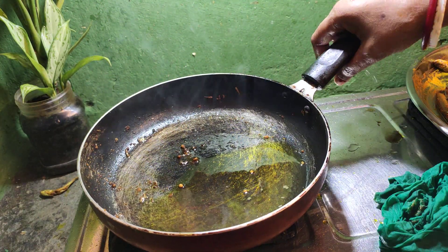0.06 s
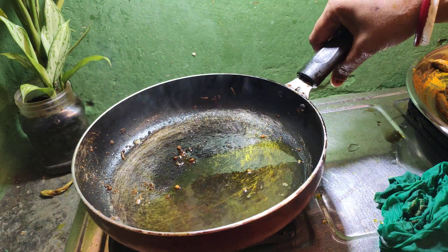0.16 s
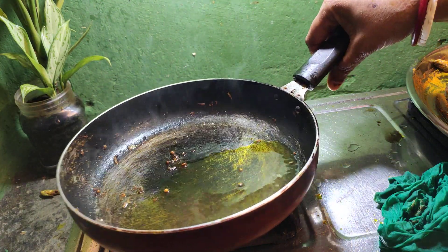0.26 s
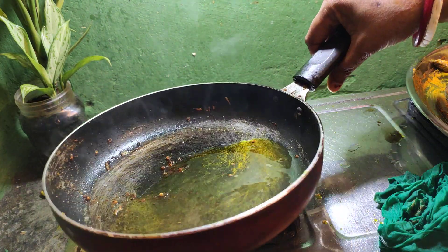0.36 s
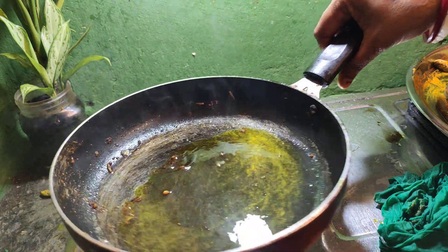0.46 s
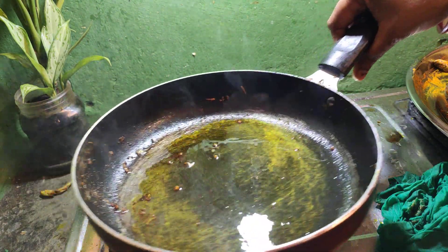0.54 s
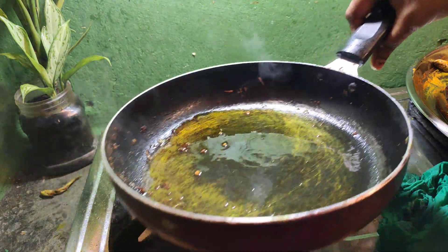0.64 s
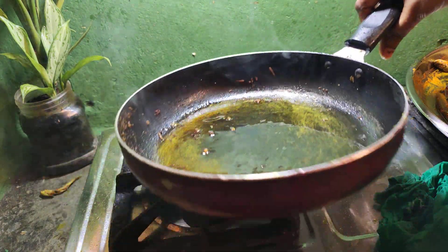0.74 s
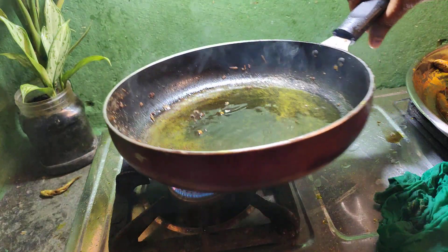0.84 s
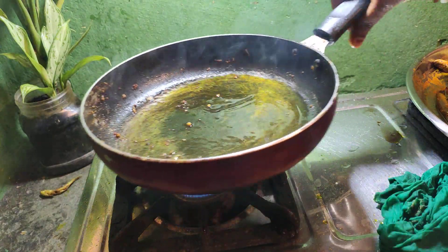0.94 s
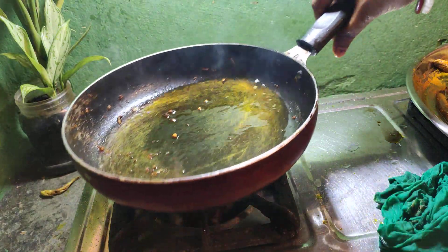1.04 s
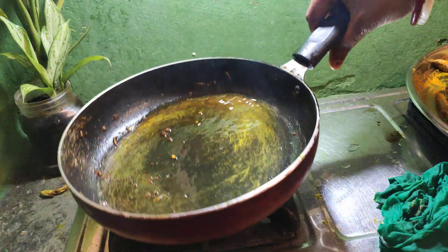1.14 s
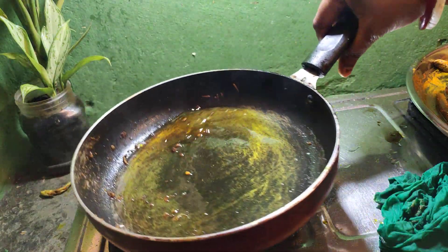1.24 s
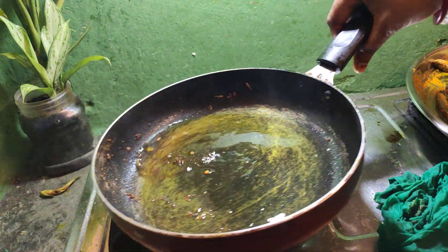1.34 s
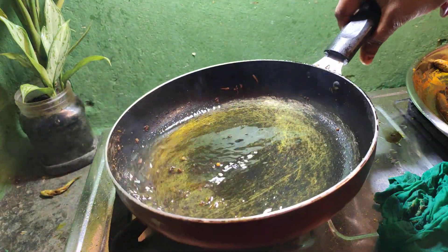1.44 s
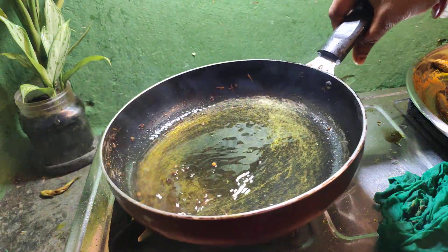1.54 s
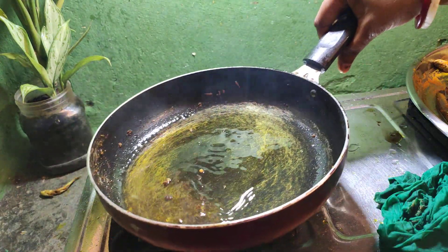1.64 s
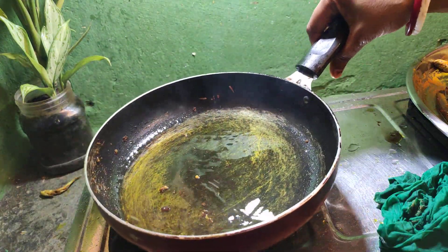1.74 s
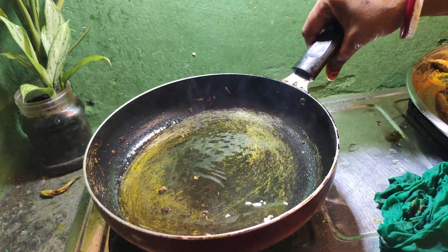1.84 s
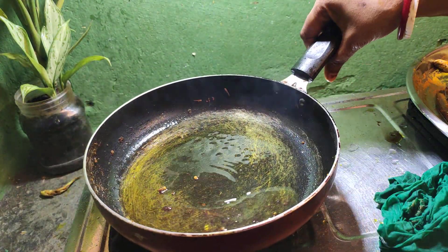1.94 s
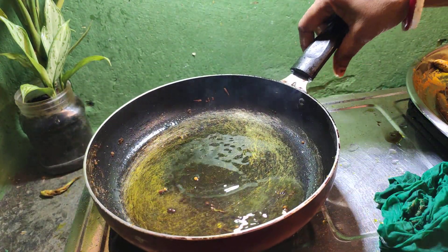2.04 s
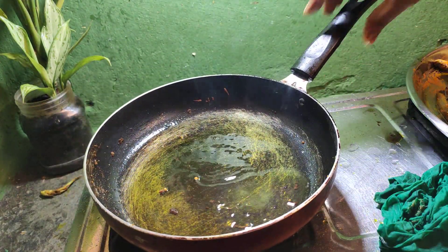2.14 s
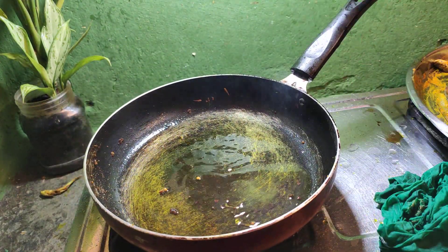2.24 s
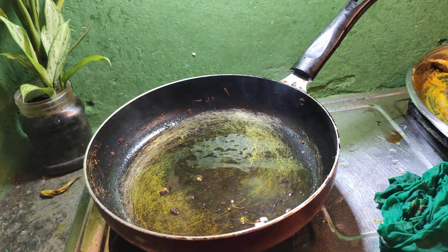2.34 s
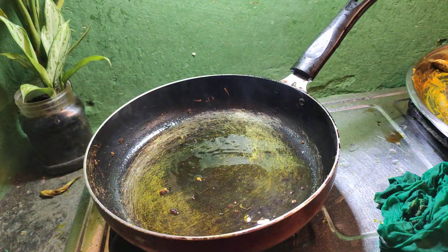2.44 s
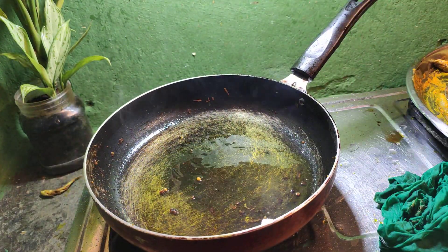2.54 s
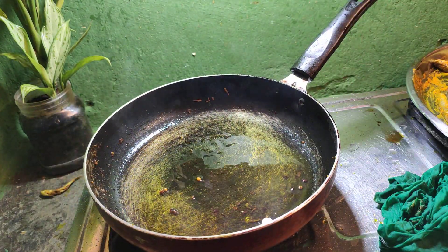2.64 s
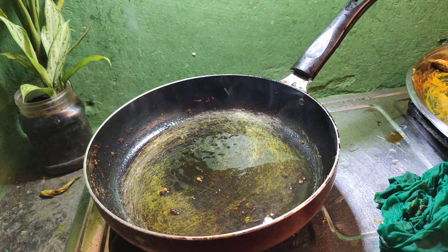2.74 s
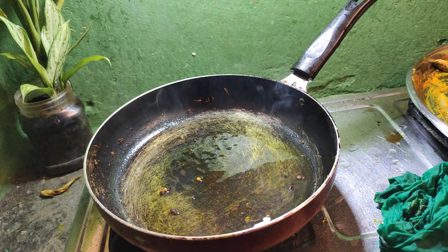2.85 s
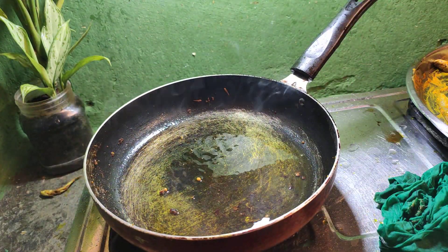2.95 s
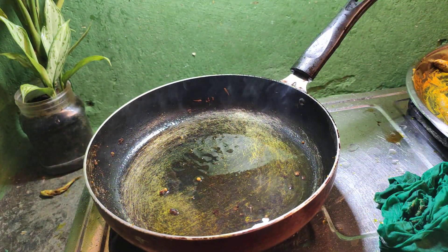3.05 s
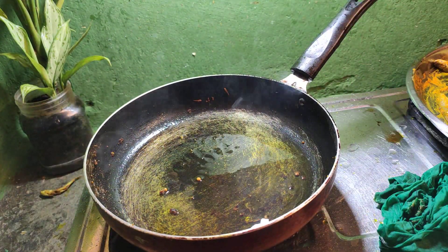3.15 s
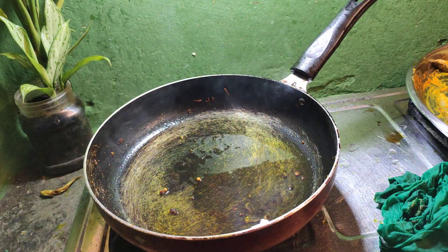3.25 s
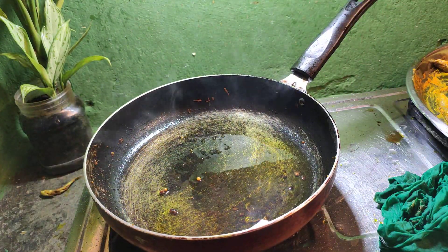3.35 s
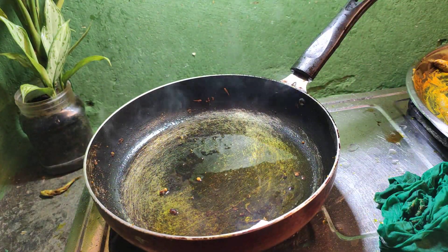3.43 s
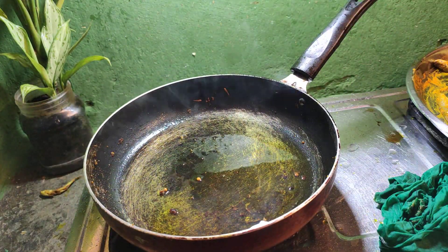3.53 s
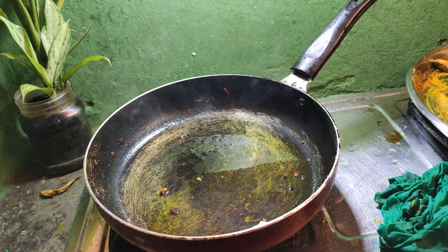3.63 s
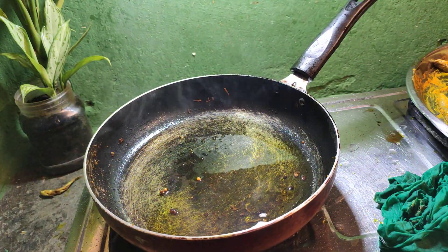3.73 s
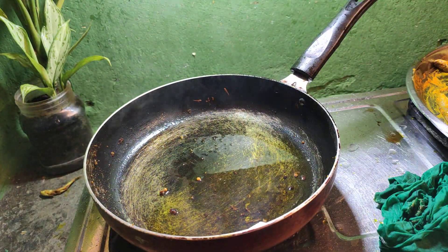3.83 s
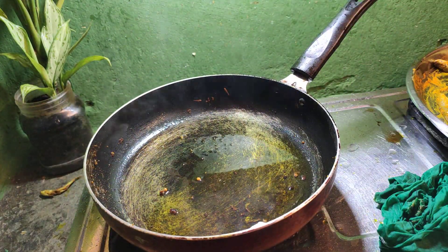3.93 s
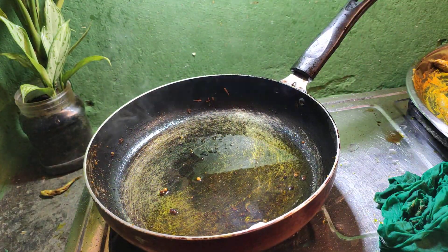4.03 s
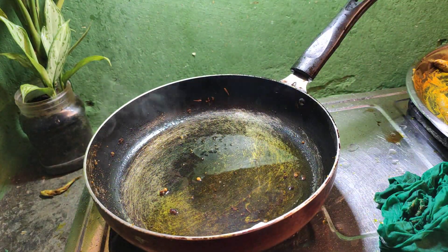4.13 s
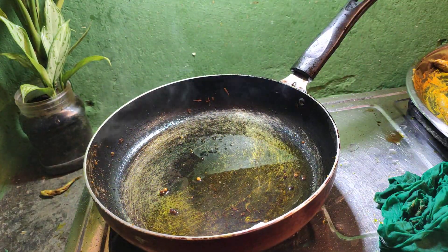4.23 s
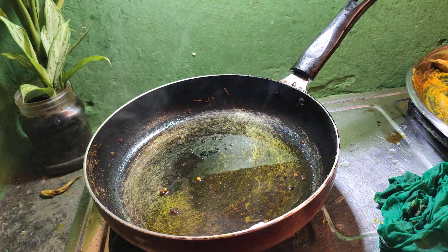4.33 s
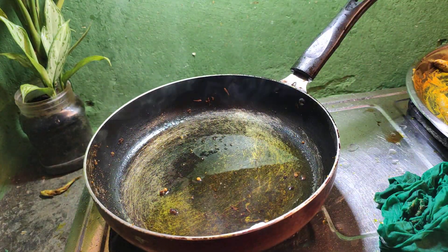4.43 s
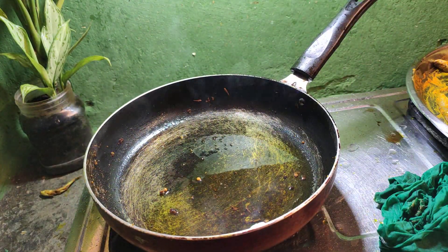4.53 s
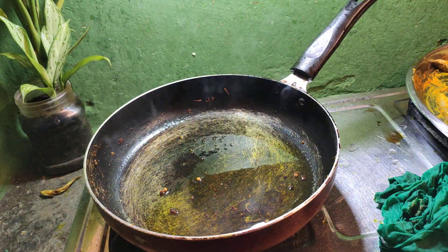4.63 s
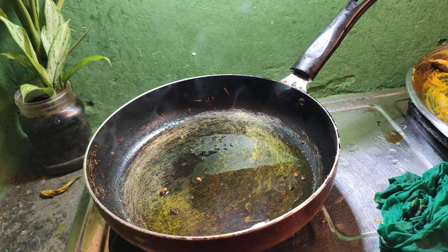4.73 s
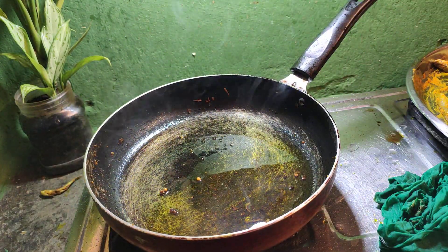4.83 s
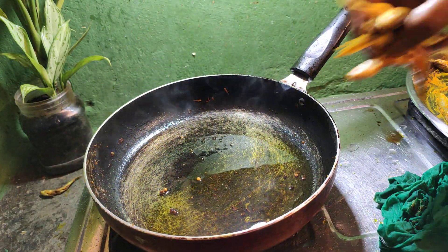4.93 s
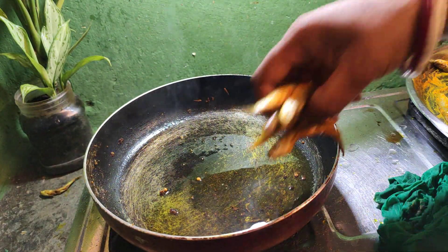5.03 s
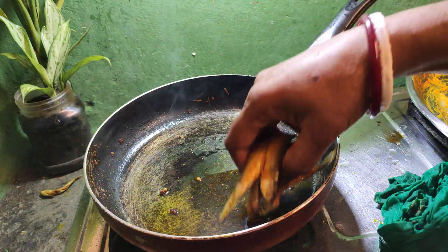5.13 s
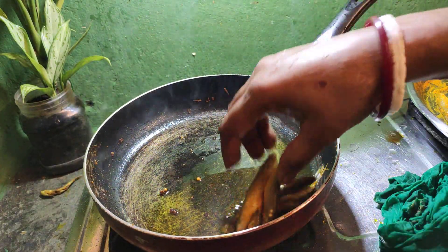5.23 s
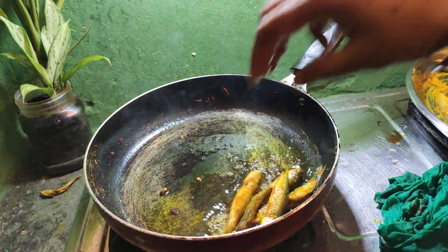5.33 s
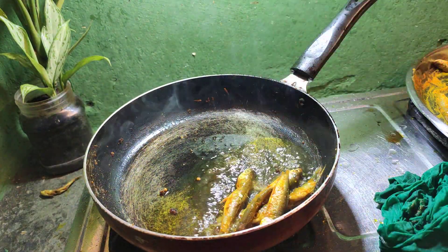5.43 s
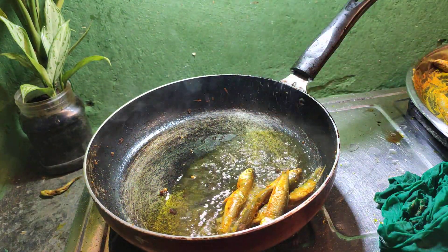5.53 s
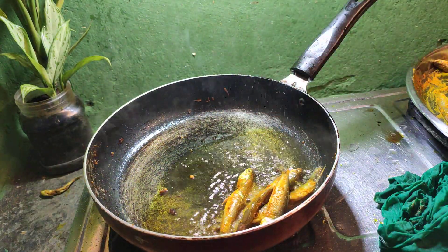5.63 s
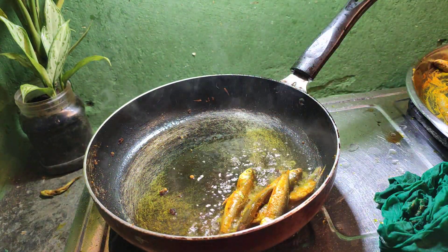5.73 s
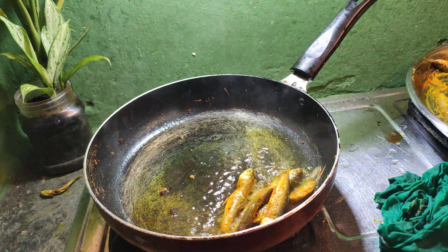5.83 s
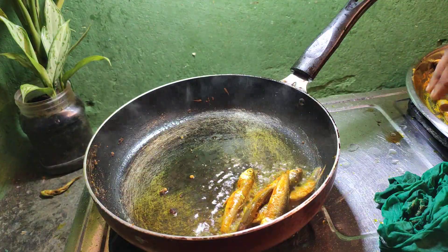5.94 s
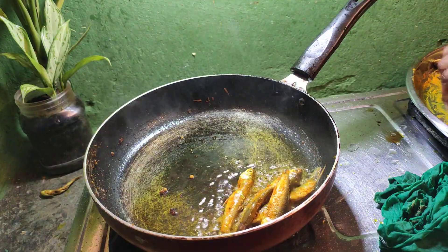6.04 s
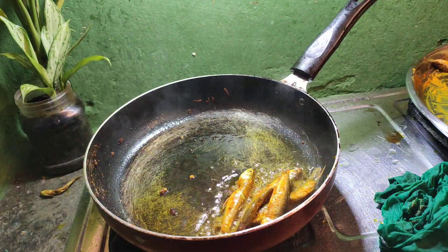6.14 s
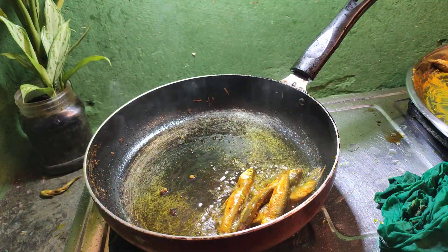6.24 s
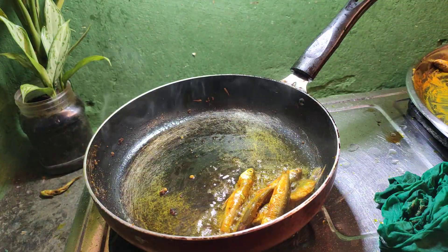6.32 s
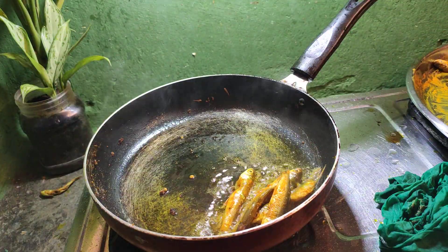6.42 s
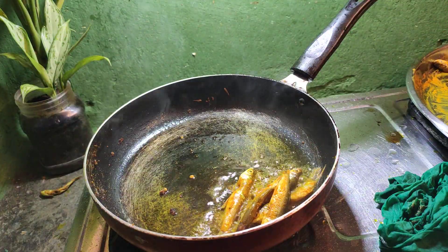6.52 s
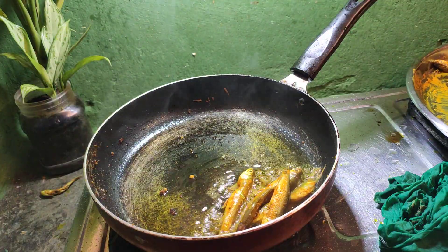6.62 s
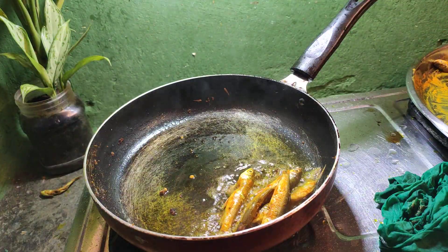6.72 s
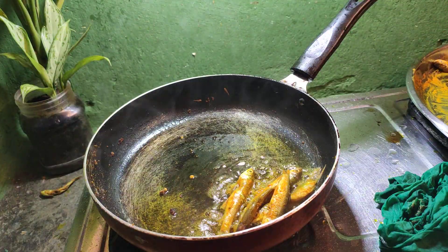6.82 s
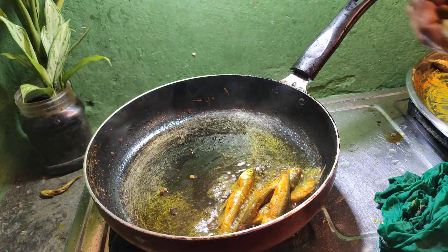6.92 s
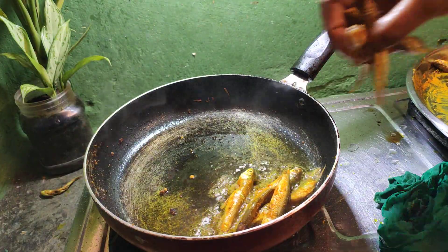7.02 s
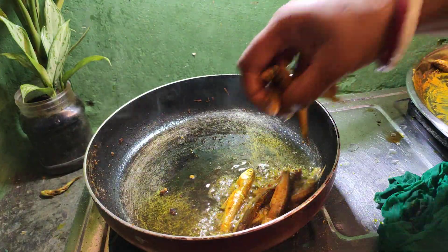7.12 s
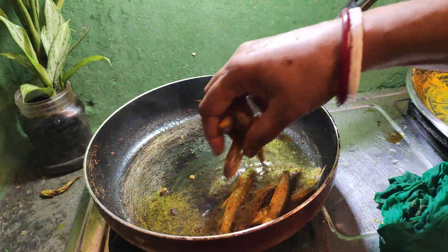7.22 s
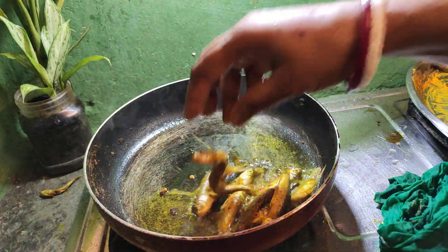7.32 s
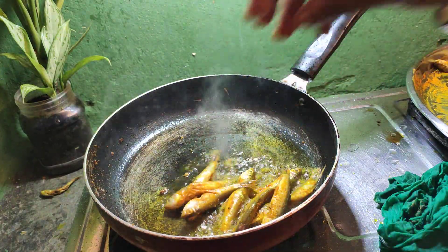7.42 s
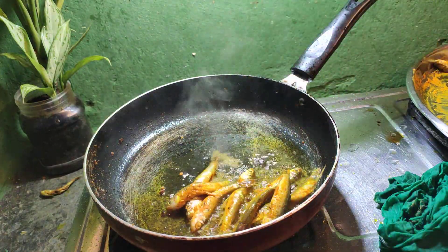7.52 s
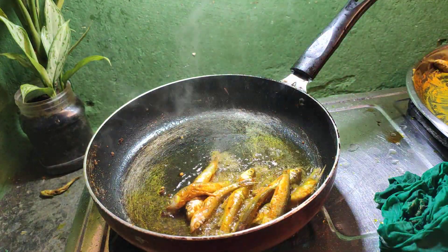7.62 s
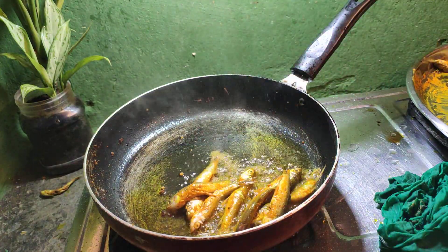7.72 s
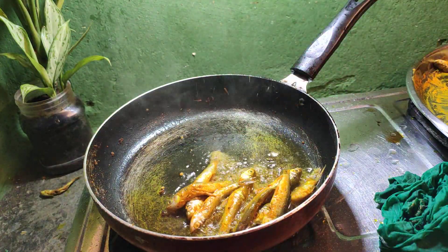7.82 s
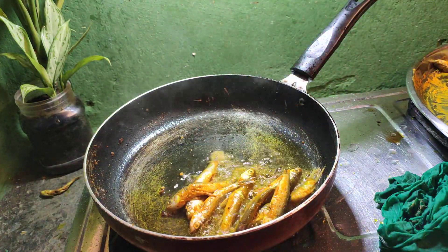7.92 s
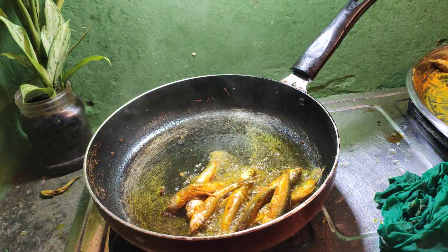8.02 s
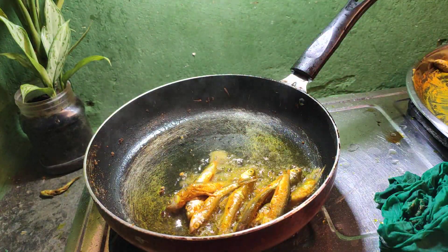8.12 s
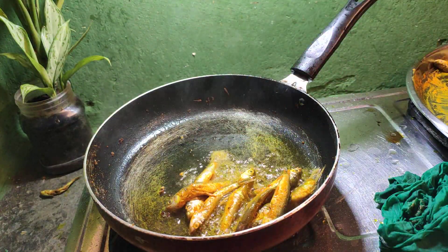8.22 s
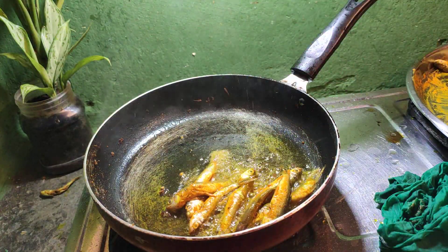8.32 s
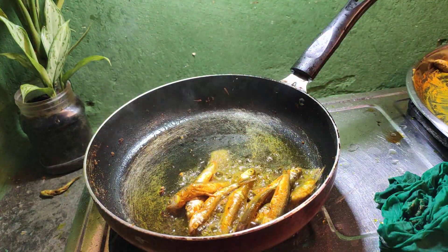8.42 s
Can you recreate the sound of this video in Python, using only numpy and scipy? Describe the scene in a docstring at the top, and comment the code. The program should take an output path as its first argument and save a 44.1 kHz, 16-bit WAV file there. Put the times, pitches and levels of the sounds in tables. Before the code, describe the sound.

Metal pan knocks and light kitchenware clinks in a small kitchen, followed by fish dropping into hot oil with a steady, spitting sizzle.

```python
"""A gas burner hisses over a low hum in a small, hard-walled kitchen. A frying pan knocks and rings as
it is lifted off the stove and swirled; kitchenware clacks, cloth rubs, bangles tick, and near 1.8 s
the pan is set down. From 3.2 s a utensil taps and a steel bowl and dish clink on the counter.
At 5.2 s and 7.3 s two handfuls of small fish go into the hot oil: steam bubbles burst by the thousand
in a sizzle with pops and spits, while dull knocks come from the counter."""
import sys
import numpy as np
from scipy import signal
from scipy.fft import rfft, irfft, next_fast_len
from scipy.io import wavfile
from scipy.ndimage import uniform_filter1d

SR = 44100
rng = np.random.default_rng(int(sys.argv[2]) if len(sys.argv) > 2 else 0)


def bounce(signal):
    """Save signal as a 16-bit WAV file at the path given by the first command-line argument."""
    frames = np.transpose(np.atleast_2d(signal))
    limited = np.clip(frames, -1, 1)
    pcm = np.round(limited * 32767).astype(np.int16)
    wavfile.write(sys.argv[1], SR, pcm)


N = 373527


def frying():
    """Fish in hot oil: sizzle, pops and spits, coloured by the pan they sit in."""
    oil = sizzle() + pops() + spits()
    # the bubbling shakes two low notes of the pan, then its hollow shape lifts two bands of the hiss
    oil = oil + 3.16 * ring(oil, 751.4, 24) + 1.78 * ring(oil, 628, 78)
    return oil + 0.4 * ring(oil, 6800, 880) + 0.17 * ring(oil, 2350, 170)


# How strong the sizzle is from bass to treble: (pitch [Hz], level [dB per Hz])
SIZZLE_TONE = [(24, -68), (40, -32), (248, -27.5), (295, -43), (335, -24), (379, -14.5), (499, -19),
               (744, -10.5), (956, -22.5), (1060, -3.5), (1320, -8.5), (2020, -2.5), (4730, 2), (6880, 2.5),
               (15700, -20)]
def sizzle(bubbles_per_s=3500, cycles=3.06, deep_below_hz=2000, spray_above_hz=3300):
    """Steam bubbles of every size burst at random all over the pan, each ringing for a few cycles."""
    main_db, deep_db, spray_db = boil_up()
    surge = wander(14)  # patches of skin boil up together
    pitches = 50 * 2 ** np.arange(0, 8.4, 1 / 3)
    shares_db = look_up(SIZZLE_TONE, pitches) + 10 * np.log10(pitches)
    shares_db -= 10 * np.log10(np.sum(gain(2 * shares_db)))  # the bands' powers add up to 1
    out = 0
    for hz, share_db in zip(pitches, shares_db):
        rate = bubbles_per_s * min(hz / 4000, 1) ** .4
        bursts = random_clicks(rate, spread_db=1.5, floor=0.0045, max_lag=4)
        band = ring(ring(bursts, hz, hz / cycles), hz, 1.1 * hz / cycles)
        deep = np.clip(np.log2(deep_below_hz / hz), 0, 1)
        spray = np.clip(2 * np.log2(hz / spray_above_hz), 0, 1)
        boil_db = deep * deep_db + (1 - deep - spray) * main_db + spray * spray_db
        out += set_level(band, share_db) * gain(boil_db + surge + 2.83 * wander(25))
    return out + crackle(main_db + 2.2 * surge)


# Fish laid in the oil: (time [s], build-up [s], stays wet [s], sizzle level [dB],
# deep bubbling over the sizzle [dB], fine spray over the sizzle [dB])
HANDFULS = [(5.192, 0.086, 0.3, -26, -4.5, 1.5), (7.297, 0.023, 0.39, -28.5, -1, 1.5)]
def boil_up(drying_s=0.33, settled_db=-6, deep_delay_s=0.036, deep_rise_s=0.049):
    """Each handful boils up, then calms as it dries. Gives sizzle, deep and spray levels in dB."""
    main = deep = spray = 0
    for start, rise_s, wet_s, db, deep_db, spray_db in HANDFULS:
        age = np.maximum(np.arange(N) / SR - start, 0)
        wet = np.exp(-np.maximum(age - wet_s, 0) / drying_s)
        power = gain(2 * db) * (wet + (1 - wet) * gain(2 * settled_db))
        swell = (1 - np.exp(-age / rise_s)) ** 4
        deep_swell = (1 - np.exp(-np.maximum(age - deep_delay_s, 0) / deep_rise_s)) ** 4
        main += power * swell
        deep += power * deep_swell * gain(2 * deep_db)
        spray += power * swell * gain(2 * spray_db * np.exp(-age / drying_s))
    return [10 * np.log10(power + 1e-14) for power in (main, deep, spray)]


def crackle(sizzle_db):
    """Lone droplets burst as sharp clicks, quieter than the sizzle."""
    clicks = random_clicks(per_s=400, spread_db=3, floor=0.014, max_lag=3.3)
    return set_level(ring(ring(clicks, 4200, 5400), 4560, 8000), -11) * gain(sizzle_db)


# The loudest pops in the oil: (time [s], level [dB], pitch [Hz])
POPS = [(5.4034, -24.5, 4530), (5.4492, -23, 4000), (5.4704, -26, 3900), (5.4974, -18.5, 6130),
        (5.629, -22, 5850), (5.7954, -29, 6700), (6.4815, -35, 6050), (6.4957, -22, 4440),
        (6.534, -27, 4460), (6.6072, -19.5, 4160), (6.6864, -24, 3410), (6.725, -21.5, 5740),
        (6.7794, -28, 3230), (7.098, -23, 6370), (7.1456, -21.5, 4560), (7.223, -20, 4780),
        (7.6714, -22.5, 4700), (7.7556, -22.5, 3270), (7.7922, -34, 6130), (8.059, -27, 6260),
        (8.14, -23.5, 3960)]
def pops():
    """Single bursts stand out of the sizzle as short, noisy notes."""
    return short_notes(POPS, fade_s=0.045, noisiness=2.5, sharpness=4, rise_s=0.001)


def spits(count=420, loudest_db=-25, lowest_hz=1697):
    """The oil spits tiny notes at random once the first fish are in."""
    start = HANDFULS[0][0] + .15
    notes = [(start + (N / SR - start) * when, loudest_db - 15.5 * softer, lowest_hz * 4.2 ** higher)
             for when, softer, higher in rng.random((count, 3))]
    return short_notes(notes, fade_s=0.018, noisiness=0.29, sharpness=7.3, rise_s=0.00022)


# The pan hitting the burner stand: (time [s], mid-range level [dB], boom [dB], lows [dB], highs [dB],
# ringing over clatter [dB], extra fading [dB per s], left over right [dB]).
# Boom, lows and highs count from the mid-range level.
PAN_KNOCKS = [(0.038, -66.5, 13, 13, 3, -42, 300, 5), (0.0793, -41.5, -8, 6, -12, -40, 300, -3),
              (0.1129, -29, -17, 0, -18.5, -47, 300, -10.5), (0.1199, -36.5, -6.5, 3.5, -16, -48, 300, 5),
              (0.189, -48, -16, -19, -29.5, -45, 300, -1.0), (0.251, -35, -12.5, 1.5, -15, -43, 200, -4),
              (1.7886, -14, -15, -9.5, -9.5, -31, 60, 3.5), (1.8077, -18.5, -16, -7, -11, -42.5, 100, -3),
              (1.9142, -41, -1.5, 7, -17, -55, 201, 3), (2.0884, -24.5, -9.5, -1, -14.5, -36, 645, 4)]
# The notes the pan rings with: (pitch [Hz], level [dB], time to fade by 60 dB [s])
PAN_NOTES = [(192.9, 0.5, .5), (304, 2.5, .15), (328, -9, 0.26), (385, -6.5, .2), (438, -0.5, 0.508),
             (484, -6.5, 0.26), (551, -4, 0.58), (685, 1.5, 0.38), (757, -5, .15), (1196, -16, .25),
             (1256, -14, 0.27), (1470, -8.5, 0.246), (1996, -16.5, .12), (2382, 6.5, .15), (2840, -13, .1),
             (3290, -7.5, .15), (3610, -12.5, .12), (3900, -14.5, .15), (4527, -12, .15), (4910, -9.5, .15),
             (5640, -6.5, .14), (6240, -10.5, 0.15), (6600, -3, .14), (7800, -18, 0.1196), (8400, -20, .1)]
def pan():
    """The pan rings at each knock, and the stove top thumps under it."""
    knocks = strike(PAN_KNOCKS, PAN_NOTES, tick_db=16, rise_ms=0.4, fade_ms=34.5, top_db=-3.5, lag=0)
    thumps = [(start, db - 36.5, 84.6) for start, db, *_ in PAN_KNOCKS]
    stove = short_notes(thumps, fade_s=0.16, noisiness=1.5, sharpness=1.2, rise_s=0.006, size=16384)
    return knocks + stove


# Each pair below has the columns of PAN_KNOCKS and PAN_NOTES. A steel dish clinking:
DISH_CLINKS = [(3.567, -34, -19, -14, 3.5, -32.5, 250, 9.5), (3.585, -32, -28, -33, -4, -31, 220, -11.5)]
DISH_NOTES = [(326, -5, .5), (1620, -10, .12), (1840, -8, 0.14), (2253, -5.5, .15), (2550, -4.5, 0.29),
              (2980, -12, .1), (3315, 3.5, 0.14), (3948, 7, 0.2), (4210, -11, .13), (5030, -5.5, .15),
              (5792, -8, .12), (6450, -2, 0.18), (7090, -9, .2), (7160, -13, .2), (8016, -20, 0.16),
              (9044, -3, .2), (9620, -5, .16), (11600, -2, .1), (12200, -6, .1)]
# A steel bowl being nudged:
BOWL_CLINKS = [(3.4214, -47, -11, 1.4, -0.82, -32, 100, 11)]
BOWL_NOTES = [(320, -3, .3), (478, -2, 0.21), (1050, -0.5, 0.92), (2280, -3, .04), (3340, -10, .2),
              (3995, -8, .2), (5400, -6, .15), (7030, -5, .12)]
# Other kitchenware clacking and sliding, with a duller sound:
WARE_CLACKS = [(0.4125, -39.5, -31, -20, -21, -53, 60, -10), (0.5394, -52, -30, -15, -4, -48, 30, -12),
               (0.838, -51.5, -32, -22, -13, -56, 30, -7), (4.988, -43.5, -45, -16.5, -18, -51.5, 60, -9.5),
               (5.05, -51, -40, -14, -14, -46, 30, -9), (5.1192, -56, -27, -7.5, 8.5, -50, 30, 7.5)]
WARE_NOTES = [(1087, 1, 0.17), (1464, 10.5, 0.26), (2070, 5, 0.11), (2690, -3, 0.077), (2990, -3, 0.06),
              (3800, 3, 0.05), (4650, -29, 0.043)]
# A utensil being tapped and shifted:
UTENSIL_TAPS = [(3.2236, -53, -33, -30, -1, -35, 301, -0.5), (3.262, -51, -30, -30, -8, -37, 300, 0),
                (3.3179, -51.5, -27, -29, -14, -30, 300, -1), (3.368, -54, -27, -27, -8, -34, 300, 0),
                (4.3074, -38, -17, -13.5, 1.5, -38, 300, 0.52),
                (4.3155, -39.5, -30, -25, 3, -32, 300, -0.25), (4.323, -40, -27, -28, 4, -42, 300, 0),
                (4.4693, -51, -37, -37, 1, -30, 297, -2)]
UTENSIL_NOTES = [(414, 3, .02), (1110, 0, .02), (2330, -1, .06), (2654, 5.5, .05), (3429, 0, .06),
                 (3760, 8, .12), (4160, 7, 0.031), (4300, 10, 0.09), (4474, 5, .1), (5830, 3, .1),
                 (6160, 14, .06), (6800, 7, .1), (8230, 0, .1), (8770, 10, .08)]
def kitchenware(lag=-17):
    """Things ring when bumped on the counter. It is on the left, so that side hears them first."""
    steel = dict(tick_db=10.2, rise_ms=4.1, fade_ms=50, top_db=6.7, lag=lag)
    dish = strike(DISH_CLINKS, DISH_NOTES, **steel)
    clacks = strike(WARE_CLACKS, WARE_NOTES, tick_db=16, rise_ms=2, fade_ms=107, top_db=8, lag=lag)
    taps = strike(UTENSIL_TAPS, UTENSIL_NOTES, tick_db=10, rise_ms=0.4, fade_ms=22, top_db=6, lag=lag)
    bowl = strike(BOWL_CLINKS, BOWL_NOTES, **steel)
    return dish + clacks + taps + bowl


# The tone of clatter, a crowd of very short notes: (pitch [Hz], level [dB])
CLATTER_TONE = [(110, -43.5), (165, -40.5), (190, -16), (260, -7.5), (700, 0.5), (1500, 5.5), (3000, 2),
                (7000, 0.5), (10000, -12), (15000, -20)]
def strike(hits, notes, tick_db, rise_ms, fade_ms, top_db, lag, size=32768):
    """A tick and a fading rattle set an object ringing; each hit has its own mix of lows and highs."""
    out, t, hz = np.zeros((2, N)), np.arange(size) / SR, frequencies(size)
    ms = 1000 * t
    ringing = 0
    for pitch, db, fade_s in notes:
        # a shape that is not quite round splits each note into two that beat together
        phase = 2 * np.pi * pitch * t
        ringing += gain(db - 60 * t / fade_s) * (np.cos(phase) + 0.3 * np.cos(1.006 * phase))
    clatter_power = gain(2 * look_up(CLATTER_TONE, frequencies(1300)))
    clatter = signal.minimum_phase(np.roll(irfft(clatter_power), 512)[1:])  # a click with that tone
    boom, low = 1 / (1 + (hz / 400) ** 6), 1 / (1 + (hz / 900) ** 6)
    high = 1 / (1 + (4000 / (hz + 1)) ** 6)
    colour = rfft(clatter, size) * gain(top_db / (1 + (8000 / (hz + 1)) ** 6))
    lead = 400  # samples of silence ahead of the blow leave room for the filters
    for start, db, boom_db, low_db, high_db, ring_db, damping, left_db in hits:
        blow = rng.standard_normal(size) * gain(-20 * ms / fade_ms) * (1 - np.exp(-ms / rise_ms))
        blow[0] += gain(tick_db)
        body = 1 + rfft(ringing * gain(ring_db - damping * t))  # whatever it touches damps the ring
        spectrum = rfft(np.roll(blow, lead)) * colour * body
        for band, band_db in (boom, boom_db), (low - boom, low_db), (1 - low - high, 0), (high, high_db):
            part = irfft(spectrum * band)[:size * 3 // 4]
            mix_in(out, start - lead / SR, part * gain(db + band_db) / abs(part).max(), left_db, lag)
    return out


# Knocks on the counter while the fish fry: (time [s], level [dB], pitch [Hz])
COUNTER_THUDS = [(6.057, -37, 662), (6.364, -43, 505), (6.429, -43, 561), (6.628, -41.5, 629),
                 (7.3, -40.5, 647), (7.589, -46, 612), (8.005, -37.5, 541), (8.305, -43.5, 576)]
def counter_thuds():
    """The counter answers each knock with a dull, blurred note."""
    return short_notes(COUNTER_THUDS, fade_s=0.12, noisiness=0.9, sharpness=0.98, rise_s=0.002)


# Bangles touching on the wrist: (time [s], level [dB], pitch [Hz])
BANGLE_TICKS = [(1.4736, -39.5, 6680), (1.4794, -43, 6800), (1.538, -46, 8360), (1.548, -48, 8500),
                (1.606, -49, 9870), (3.2005, -55.5, 6200)]
def bangles():
    """Bangles tick together with a high, very short ring."""
    return short_notes(BANGLE_TICKS, fade_s=0.038, noisiness=1.8, sharpness=2.5, rise_s=0.0001)


# Soft strokes of hand and cloth: (middle time [s], level [dB], half length [s], pitch [Hz])
RUBS = [(0.61, -71, 0.37, 4600), (1.477, -66, 0.057, 3240), (2.48, -69.5, 0.053, 1950),
        (2.678, -57.5, 0.029, 2420), (3.35, -69.5, 0.084, 3040), (4.056, -62, 0.018, 3450),
        (4.123, -62.5, 0.11, 930), (4.487, -65, 0.11, 3330)]
def rubs():
    """Rubbing makes a grainy noise that swells and fades."""
    out, t = np.zeros((2, N)), np.arange(N) / SR
    for middle, db, half_s, hz in RUBS:
        grain = rng.standard_normal(N) * gain(1.5 * rng.exponential(size=N))
        swell = np.exp(-((t - middle) / half_s) ** 2 / 2)
        out += set_level(ring(grain, hz, 0.88 * hz), db) * swell
    return out


# How long the kitchen echoes: (pitch [Hz], time to fade by 60 dB [s])
ECHO_TIMES = [(100, 0.33), (700, 0.39), (3000, 0.28), (8000, 0.28), (15000, 0.14)]
def room_echo(sound, spot_s=0.15, size=16384):
    """Hard walls echo like fading noise. Each short piece of sound gets its own spot's echo pattern."""
    t, hz, noise = np.arange(size) / SR, frequencies(size), room_noise(size)
    pitches = 60 * 2 ** np.arange(0, 8.1, .5)
    bands = np.array([irfft(noise * np.clip(1 - 2 * abs(np.log2((hz + 1) / p)), 0, 1)) for p in pitches])
    fades = np.array([gain(-60 * t / look_up(ECHO_TIMES, p)) for p in pitches])[:, None]
    fades *= 1 - np.exp(-t / 0.0081)  # echoes thicken over the first milliseconds
    hop = int(spot_s * SR)
    window = np.sin(np.pi * np.arange(2 * hop) / (2 * hop))
    mono = np.pad(sound.mean(axis=0), (hop, 2 * hop))
    out = np.zeros((2, N + 4 * hop + size))
    for i in range(0, N + hop, hop):
        tail = np.sum(np.roll(bands, rng.integers(size), axis=2) * fades, axis=0)
        tail /= np.sqrt(np.sum(tail ** 2) / 2)
        piece = mono[i:i + 2 * hop] * window
        out[:, i:i + 2 * hop + size - 1] += signal.fftconvolve(piece[None], tail, axes=1)
    return out[:, hop:hop + N]


# The tone of the steady hum and hiss: (pitch [Hz], level [dB per Hz])
BACKGROUND_TONE = [(12, -30), (20, -1), (65, -34), (90, -13), (130, -18), (162, -9), (253, -20.5),
                   (291, -6), (374, -4), (455, -14), (508, -7), (965, -16), (1510, -18.5), (3480, -16.5),
                   (15700, -32.5)]
# Notes of the room within the hum: (pitch [Hz], width [Hz], level [dB])
ROOM_NOTES = [(302.6, 5.6, -82.5), (393, 13, -74.5), (626, 41, -82.5)]
# Steady notes of a far motor: (pitch [Hz], level [dB])
MOTOR_NOTES = [(107.7, -89.5), (156.1, -84.5)]
def background():
    """The burner's hiss and a far street's hum waver a little, over room notes and a motor."""
    size, t = next_fast_len(N), np.arange(N) / SR
    air = room_noise(size) * gain(look_up(BACKGROUND_TONE, frequencies(size)))
    treble = 1 / (1 + (800 / (frequencies(size) + 1)) ** 4)
    notes = sum(set_level(ring(rng.standard_normal(N), hz, width), db) for hz, width, db in ROOM_NOTES)
    motor = sum(set_level(np.sin(2 * np.pi * hz * t), db) for hz, db in MOTOR_NOTES)
    street = set_level(irfft(air * (1 - treble), size)[:, :N], -71.5) * gain(2.2 * wander(6.2))
    burner = set_level(irfft(air * treble, size)[:, :N], -68) * gain(0.5 * wander(6.4))
    return street + burner + notes + motor


# How alike the room sounds on the left and right: (pitch [Hz], likeness [0 to 1])
LIKENESS = [(60, 1), (250, 0.8), (700, 0.14), (1500, 0), (4000, 0), (12000, 0)]
def room_noise(size):
    """Left and right spectra of noise from all around: alike in the bass, unrelated in the treble."""
    shared, side = rfft(rng.standard_normal((2, size)))
    alike = look_up(LIKENESS, frequencies(size))
    return np.sqrt((1 + alike) / 2) * shared + np.sqrt((1 - alike) / 2) * side * np.array([[1], [-1]])


def short_notes(notes, fade_s, noisiness, sharpness, rise_s, size=8192):
    """Notes blurred by noise around their pitch, each fading by 60 dB in fade_s."""
    out, t = np.zeros((2, N)), np.arange(size) / SR
    for start, db, hz in notes:
        noise = ring(ring(rng.standard_normal(size), hz, hz / sharpness), hz, 2 * hz / sharpness)
        note = (np.sin(2 * np.pi * hz * t) + noisiness * noise / noise.std()) / (1 + noisiness)
        mix_in(out, start, note * gain(db - 60 * t / fade_s) * (1 - np.exp(-t / rise_s)))
    return out


def random_clicks(per_s, spread_db, floor, max_lag):
    """Scattered clicks, up to max_lag samples apart left and right; floor limits the loudest."""
    when, sign, strength, side = rng.random((int(per_s * N / SR), 4)).T
    heights = np.sign(sign - .5) * gain(-spread_db * np.log(strength + floor))
    left = (when * (N - 64)).astype(int) + 32
    right = left + np.round(max_lag * (2 * side - 1)).astype(int)
    return np.array([np.bincount(places, heights, N) for places in (left, right)])


def mix_in(out, start, sound, left_db=0, lag=0):
    """Adds a sound at start seconds; the left side is left_db louder and lag samples later."""
    for channel, (late, db) in enumerate(((lag, left_db / 2), (0, -left_db / 2))):
        i = int(start * SR) + late
        out[channel, i:i + len(sound)] += sound[:N - i] * gain(db)


def wander(per_s):
    """A smooth random drift around zero."""
    hold = int(SR / per_s)
    steps = np.repeat(rng.standard_normal(N // hold + 1), hold)
    return 0.75 * uniform_filter1d(uniform_filter1d(steps, hold), hold)[:N]


def ring(sound, hz, width_hz):
    """A resonance: lets through the sound near one pitch."""
    return signal.lfilter(*signal.iirpeak(min(hz, .45 * SR), max(hz / width_hz, .3), fs=SR), sound)


def look_up(table, hz):
    """Reads between the rows of a (pitch, value) table, on a scale of octaves."""
    pitches, values = np.transpose(table)
    return np.interp(np.log(hz + 1), np.log(pitches), values)


def frequencies(size):
    return np.arange(size // 2 + 1) * SR / size


def gain(db):
    return 10 ** (np.asarray(db) / 20)


def set_level(sound, db):
    return sound * gain(db) / np.sqrt(np.mean(sound ** 2))


def scene():
    """All sources and their echo; things on the counter are further off, so they echo more."""
    knocks, ware, ticks, thuds, fish = pan(), kitchenware(), bangles(), counter_thuds(), frying()
    direct = gain(1) * knocks + gain(0.5) * ware + ticks + gain(3.5) * thuds + fish + rubs()
    to_walls = (gain(-2.5) * knocks + gain(3) * ware + gain(-6) * ticks
                + gain(2) * thuds + gain(-5.5) * fish)
    return direct + room_echo(to_walls) + background()


def record(dry):
    """A nearby phone cuts the treble above 15750 Hz."""
    return signal.sosfilt(signal.ellip(10, .2, 80, 15750, fs=SR, output="sos"), dry)


dry = scene()
out = record(dry)
bounce(out)
```